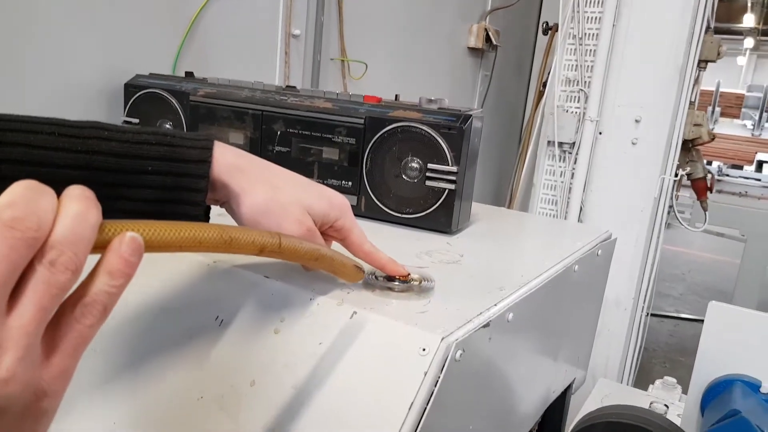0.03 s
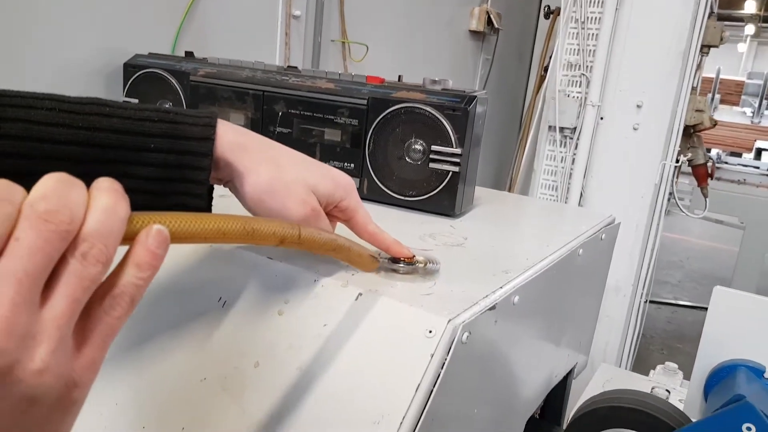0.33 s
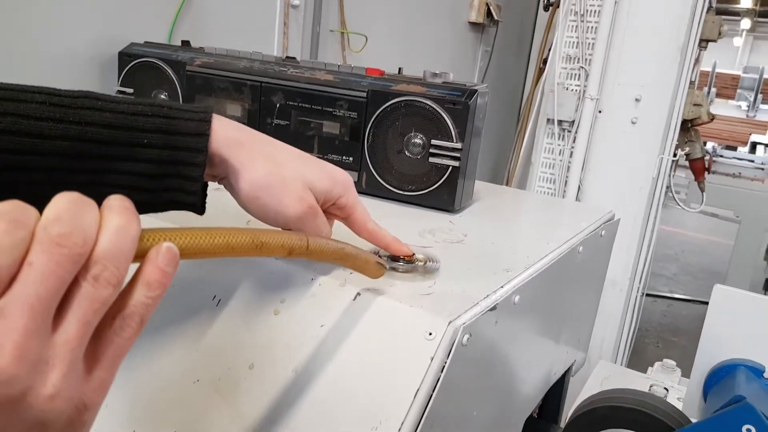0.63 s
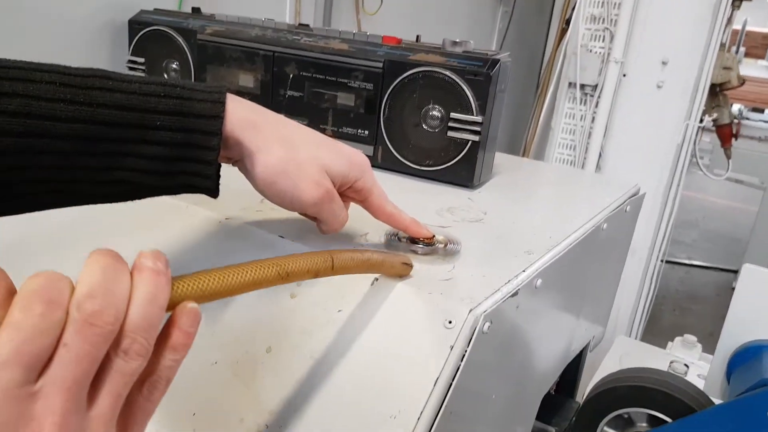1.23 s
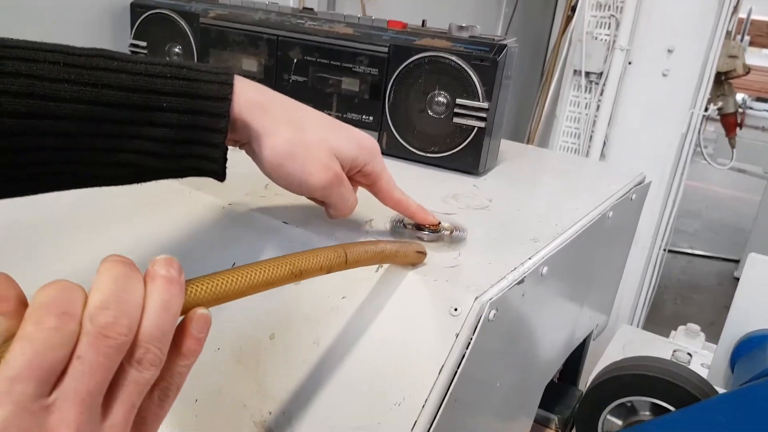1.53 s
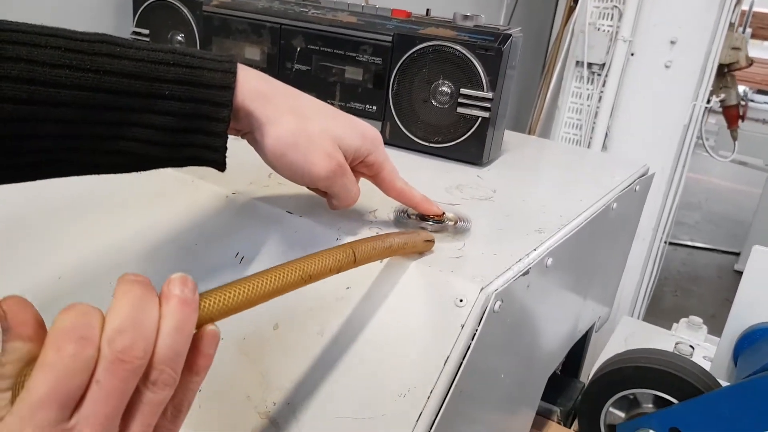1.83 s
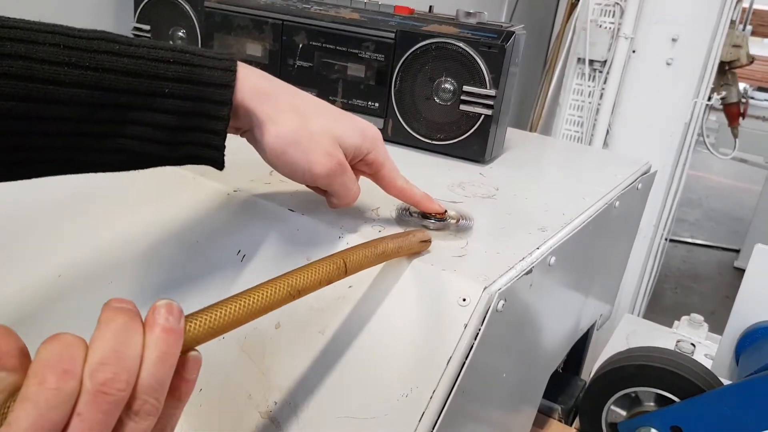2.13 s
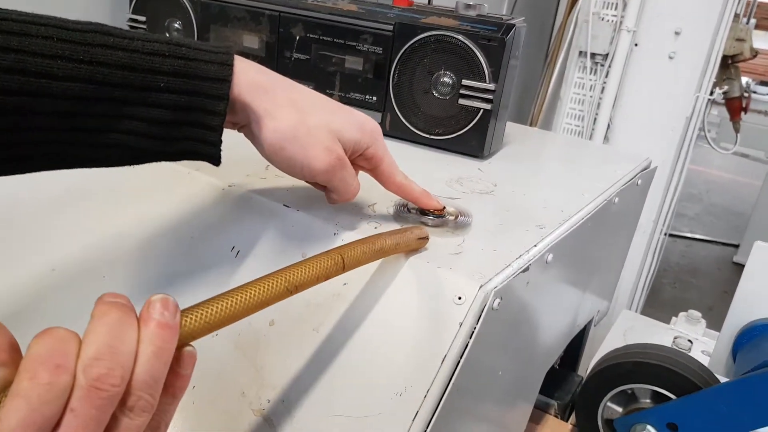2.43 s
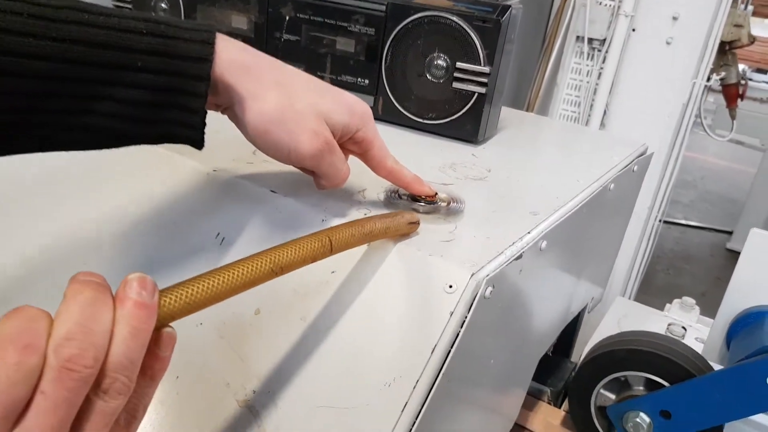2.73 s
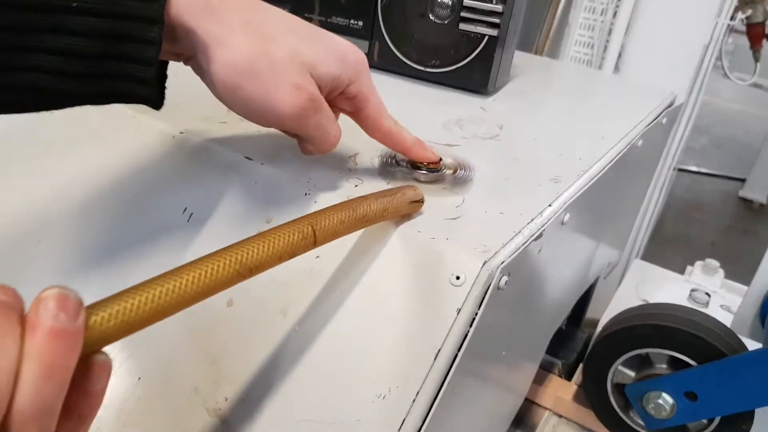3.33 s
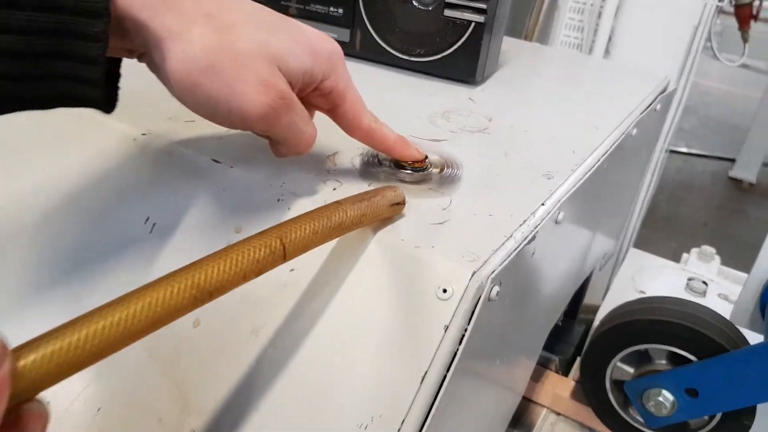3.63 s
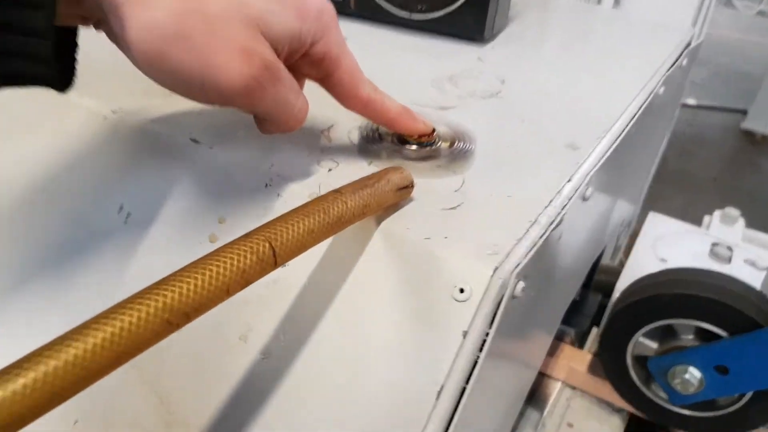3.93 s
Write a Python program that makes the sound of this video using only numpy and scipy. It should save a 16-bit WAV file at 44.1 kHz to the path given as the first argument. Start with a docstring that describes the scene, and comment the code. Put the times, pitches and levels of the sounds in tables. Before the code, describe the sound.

A steady compressed-air hiss spins a fidget spinner into a rising, siren-like whine.

```python
"""A workshop: a compressed-air hose blows on a three-armed spinner held down on a metal cabinet.
The jet hisses steadily, with faint airy resonances where it meets the spinner's edge.
The arms chop it like a siren, so a whine climbs as the spinner gathers speed.
Stray air reaches the microphone, first as single puffs, then as a growing flutter."""
import sys
import numpy as np
from scipy import signal
from scipy.fft import rfft, irfft
from scipy.io import wavfile
from scipy.ndimage import map_coordinates

SR = 44100
rng = np.random.default_rng(int(sys.argv[2]) if len(sys.argv) > 2 else 0)


def inscribe(sig):
    """Save sig as 16-bit PCM at rate SR to the path in sys.argv[1].

    A 1-D sig is mono; a 2-D sig holds one channel per row.
    Samples are clipped to [-1, 1] before scaling.
    """
    pcm = np.round(np.clip(np.atleast_2d(sig).T, -1, 1) * 32767)
    wavfile.write(sys.argv[1], SR, pcm.astype(np.int16))


N = 176400
TIME_S = np.arange(N) / SR
BINS_HZ = np.maximum(np.arange(N // 2 + 1) * SR / N, 1)

# Jet position: time_s, left_lead_ms, left_minus_right_db, diffuse_share
JET_POSITION = [(.2, 0.025, 1, 0.3), (.75, 0.018, 0.3, .12), (1.3, 0.0044, -0.5, .03),
                (2.25, 0.0028, -.3, .02), (2.75, 0.015, -0.5, 0.1), (3.25, 0.017, -0.7, 0.48),
                (3.8, .044, -1.5, 0.54)]
# Echoes off cabinet, hand and wall: left_delay_ms, right_delay_ms, gain_db
JET_ECHOES = [(.88, 0.58, -15.5), (1.4, 0.96, -21), (2.3, 1.85, -12), (3.3, 2.9, -27)]
# Crackle of the jet breaking on the spinner: time_s, depth
JET_CRACKLE = [(0, 0.2), (.7, .12), (.8, .24), (1.3, 0.22), (1.8, 0.14), (2.6, 0.17), (2.9, 0.1), (4, 0.14)]
# Left-right likeness of the hiss: freq_hz, share
JET_COHERENCE = [(100, 0.26), (800, 0.22), (3300, 0.49), (6200, 0.7), (9500, 0.42), (13000, 0.39)]
# Hiss colour: freq_hz, density_db
JET_SPECTRUM = [(25, -28), (80, -15), (300, -9.5), (900, -10), (1400, -8.5), (2400, -8), (2650, -4.5),
                (3050, -1), (4000, 0.6), (4600, 1), (5800, 0.4), (6800, 0.5), (7500, 0.6), (8000, -5.5),
                (8400, -7), (9800, -4.5), (11200, -2), (13400, -2), (14600, -4), (15800, -8)]
# Hiss balance: freq_hz, left_minus_right_db
JET_PAN = [(100, 9.5), (800, 4), (3300, 1.5), (6200, 0.4), (9500, 2), (13000, 3)]
# Borders of the five hiss bands: freq_hz
BAND_EDGES_HZ = [2706, 7500, 11500, 14300]
# Band gains as the nozzle is aimed: time_s, low_db, middle_db, upper_db, high_db, top_db
BAND_GAINS = [(0, -14, -12, -12, -13, -12), (.65, -13, -12.5, -13, -10.5, -9),
              (.95, -12.5, -12.5, -12, -9, -15), (1.5, -12.5, -12, -13, -11.5, -15),
              (2, -11, -13, -13, -11, -15), (2.5, -10.5, -13, -13, -12.5, -15),
              (3, -9.5, -14, -12.5, -15.5, -14), (3.23, -8.5, -14, -11.5, -14.5, -14),
              (3.42, -11, -13.5, -11.5, -14.5, -11), (3.6, -8, -14, -13.5, -13, -11),
              (4, -8.5, -12.5, -12, -12, -12)]
# Resonances at the spinner's edge: peak_s, half_length_s, centre_hz, half_width_hz, level_db
EDGE_RESONANCES = [(.1, 0.67, 1800, 160, -38), (.35, 0.54, 4440, 170, -30), (0.747, .25, 3100, 220, -29),
                   (1.5, 0.33, 5240, 800, -22.5)]
# Arms crossing the jet: time_s, rate_hz
CHOP_RATE = [(0, 330), (.3, 512), (.52, 641), (.88, 806), (.97, 868), (1.28, 1013), (1.5, 1140),
             (1.75, 1284), (1.9, 1400), (2.02, 1509), (2.15, 1629), (2.33, 1773), (2.52, 1886),
             (2.75, 2015), (2.88, 2069), (3.08, 2133), (3.5, 2218), (4, 2311)]
# Whine fundamental: time_s, left_db, right_db
HARMONIC_1 = [(0, -54, -55), (.4, -31, -29), (.8, -29.5, -32.5), (1.08, -30.5, -33), (1.55, -25, -24.5),
              (1.68, -30, -23), (1.88, -17, -17.5), (2.03, -20.5, -28), (2.12, -30, -15.5),
              (2.28, -24, -27.5), (2.48, -32, -16), (2.68, -18.5, -38), (2.88, -20, -14.5),
              (3.02, -22, -62), (3.33, -37, -31), (3.67, -33, -21), (4, -40, -36)]
# Whine octave: time_s, left_db, right_db
HARMONIC_2 = [(0, -50, -47), (.7, -35, -29.5), (1, -35, -34), (1.17, -35, -24), (1.35, -26.5, -47),
              (1.6, -30, -44), (1.75, -22.5, -28), (1.96, -14.5, -15), (2.11, -20, -19), (2.25, -14.5, -17),
              (2.38, -21.5, -18), (2.75, -17, -22), (3, -24, -16.5), (3.25, -20, -17.5), (3.38, -22, -19.5),
              (3.61, -23, -10.5), (3.83, -17.5, -15), (4, -17, -11.5)]
# Whine third harmonic: time_s, level_db
HARMONIC_3 = [(0, -48), (1.1, -41), (1.5, -29), (2.03, -20.5), (2.35, -24), (2.48, -25), (3.2, -30),
              (3.5, -31), (3.8, -32), (4, -35)]
# Puffs on the microphone: start_s, level_db, left_minus_right_db, rise_s
MIC_PUFFS = [(0.156, -8.5, 30, .0012), (0.788, -15, 23, .001), (1.065, -11, 17, 0.00038),
             (1.259, -11.5, 20, .0012), (1.330, -14.5, 18, 0.00045), (1.461, -14, 21, 0.0011),
             (1.653, -13.5, 1, 0.0011), (1.903, -10, 13, 0.00062), (2.254, -12, 12, 0.00061),
             (2.348, -16, 15, 0.00089), (2.443, -4.5, 18, 0.00097), (2.520, -10, 20, .0017),
             (2.611, -10.5, 10, 0.00064), (2.674, -10, 10, 0.00055), (2.737, -6.5, 22, 0.00023),
             (2.786, -11, 10, 0.0011), (3.196, -7, 5, .0005), (3.207, -8, 5, 0.00065),
             (3.353, -11.5, 15, .0008), (3.712, -10, -2, .001), (3.864, -7, 0, .0006)]
# Flutter of stray air on the microphone: time_s, left_db, right_db
DRAUGHT_LEVELS = [(0, -52, -63), (.9, -44, -49), (1.3, -33.5, -38), (2.2, -32.5, -33.5), (2.8, -29.5, -35),
                  (3, -21, -31), (3.22, -19.5, -37), (3.43, -25, -32), (3.6, -22, -27.5), (3.88, -21, -23),
                  (4, -22.5, -22)]
# Flutter colour: freq_hz, density_db
DRAUGHT_SPECTRUM = [(20, -17), (50, -8), (100, 0), (200, -1.5), (400, -4.5), (750, -6.5), (1100, -8),
                    (1600, -15), (3000, -35), (8000, -50)]


def from_db(db):
    """Decibels to gain."""
    return 10 ** (np.asarray(db) / 20)


def unit_rms(x):
    """Scale to unit rms."""
    return x / np.sqrt(np.mean(x ** 2))


def over_time(rows):
    """Each value column at every sample."""
    time_s, *columns = np.transpose(rows)
    return np.array([np.interp(TIME_S, time_s, column) for column in columns])


def over_hz(rows):
    """A spectrum table at every bin."""
    freq_hz, values = np.transpose(rows)
    return np.interp(np.log(BINS_HZ), np.log(freq_hz), values)


def drift(rate_hz):
    """Smooth random wander, unit rms."""
    return unit_rms(irfft(rfft(rng.standard_normal(N)) / (1 + (BINS_HZ / rate_hz) ** 2), N))


def stereo_drift(rate_hz):
    """One independent wander per channel."""
    return np.array([drift(rate_hz), drift(rate_hz)])


def pan(side_db):
    """Constant-power left and right gains."""
    ratio = from_db(side_db)
    return np.array([ratio, np.ones_like(ratio)]) * np.sqrt(2 / (1 + ratio ** 2))


def butter(x, cutoff_hz, kind):
    """Causal second-order Butterworth filter."""
    return signal.sosfilt(signal.butter(2, cutoff_hz, kind, fs=SR, output="sos"), x)


def low_noise(cutoff_hz):
    """Low-passed noise, unit rms."""
    return unit_rms(butter(rng.standard_normal(N), cutoff_hz, "low"))


def delayed(x, delay_ms):
    """Moving fractional delay."""
    return map_coordinates(x, [np.arange(N) - delay_ms * SR / 1000], order=5, mode="wrap")


def reflections(x, sway_ms=0.147, sway_hz=0.66):
    """Nearby surfaces comb the hiss; the combs drift as hose and microphone sway."""
    out = np.zeros((2, N))
    for left_ms, right_ms, gain_db in JET_ECHOES:
        for channel, delay_ms in enumerate((left_ms, right_ms)):
            out[channel] += from_db(gain_db) * delayed(x, delay_ms + sway_ms * drift(sway_hz))
    return out


def jet_hiss(crackle_hz=1520, flicker_db=0.47, flicker_hz=22):
    """Crackling jet noise: a direct part that moves with the hose, echoes and diffuse room sound."""
    lead_ms, side_db, diffuse_share = over_time(JET_POSITION)
    direct = rng.standard_normal(N)
    near = np.array([direct, delayed(direct, lead_ms)]) + reflections(direct)
    room = rng.standard_normal((2, N))
    field = np.sqrt(1 - diffuse_share) * near + np.sqrt(diffuse_share) * room
    depth, = over_time(JET_CRACKLE)
    crackle = np.exp(depth * low_noise(crackle_hz) - depth ** 2)  # unit mean power
    coherence = over_hz(JET_COHERENCE)
    incoherent = rfft(rng.standard_normal((2, N)))
    spectrum = np.sqrt(coherence) * rfft(field * crackle) + np.sqrt(1 - coherence) * incoherent
    spectrum *= unit_rms(from_db(over_hz(JET_SPECTRUM))) * pan(over_hz(JET_PAN))
    band_of_bin = np.searchsorted(BAND_EDGES_HZ, BINS_HZ)
    flicker = from_db(flicker_db * drift(flicker_hz))
    hiss = np.zeros((2, N))
    for band, gain_db in enumerate(over_time(BAND_GAINS)):
        hiss += from_db(gain_db) * irfft(spectrum * (band_of_bin == band), N)
    return pan(side_db) * flicker * hiss


def edge_tones():
    """Turbulence at the spinner's edge drives resonances that swell and fade."""
    out = np.zeros(N)
    for peak_s, half_length_s, centre_hz, half_width_hz, level_db in EDGE_RESONANCES:
        detuning = (BINS_HZ - centre_hz) / half_width_hz
        ring = irfft(rfft(rng.standard_normal(N)) / (1 + detuning ** 2), N)
        swell = np.exp(-((TIME_S - peak_s) / half_length_s) ** 2)
        out += from_db(level_db) * unit_rms(ring) * swell
    return out


def spinner_whine(wobble_share=0.0008, flutter_db=1.5, upper_blur_rad=0.5, room_rad=0.44):
    """The arms chop the jet into four harmonics that flutter in the turbulence; the upper two blur."""
    chop_hz, = over_time(CHOP_RATE)
    wobble = 1 + wobble_share * drift(rate_hz=31.7)
    left_phase = 2 * np.pi * np.cumsum(chop_hz * wobble) / SR
    lead_s = over_time(JET_POSITION)[0] / 1000
    phases = np.array([left_phase, left_phase - 2 * np.pi * chop_hz * lead_s])
    third_db = over_time(HARMONIC_3)
    harmonics = [(over_time(HARMONIC_1), 0), (over_time(HARMONIC_2), 0),
                 (third_db, upper_blur_rad), (third_db - 10, upper_blur_rad)]
    out = np.zeros((2, N))
    for number, (level_db, blur_rad) in enumerate(harmonics, 1):
        # The glide meets the room's standing waves differently at each ear.
        room_phase = room_rad * stereo_drift(rate_hz=3.4)
        gain = from_db(level_db + flutter_db * drift(rate_hz=20))
        blur = blur_rad * drift(rate_hz=90)
        out += gain * np.sin(number * phases + room_phase + blur)
    return out


def mic_puffs(roughness=0.36, roughness_hz=920, low_cut_hz=102):
    """Each eddy hitting the microphone is one quick, ragged push of pressure."""
    ragged = 1 + roughness * low_noise(roughness_hz)
    pressure = np.zeros((2, N))
    for start_s, level_db, side_db, rise_s in MIC_PUFFS:
        age = np.clip((TIME_S - start_s) / rise_s, 0, 60)  # in rise times
        pulse = age * np.exp(1 - age)
        pressure += pan(side_db)[:, None] * from_db(level_db) * pulse
    return butter(pressure * ragged, low_cut_hz, "high")


def mic_draught(gust_db=3.5, gust_hz=91):
    """Stray air makes lumpy low noise, separate at each microphone port."""
    lumps = rng.standard_normal((2, N)) * from_db(gust_db * stereo_drift(gust_hz))
    rumble = irfft(rfft(lumps) * from_db(over_hz(DRAUGHT_SPECTRUM)), N)
    return from_db(over_time(DRAUGHT_LEVELS)) * unit_rms(rumble)


def scene():
    """Hiss, edge tones, whine and air on the microphone."""
    return jet_hiss() + edge_tones() + spinner_whine() + mic_puffs() + mic_draught()


def record(dry):
    """Soft peak limiter, then a steep low-pass."""
    ceiling, cutoff_hz = 0.88, 15850
    limited = dry / (1 + (dry / ceiling) ** 8) ** (1 / 8)
    return irfft(rfft(limited) / np.sqrt(1 + (BINS_HZ / cutoff_hz) ** 700), N)


dry = scene()
out = record(dry)
inscribe(out)
```